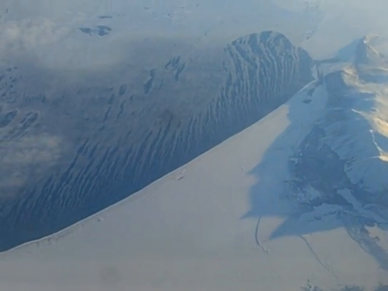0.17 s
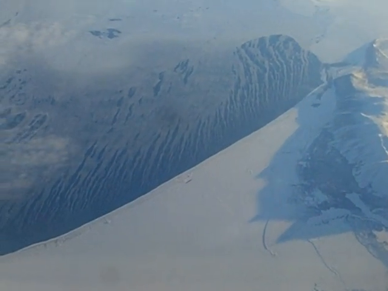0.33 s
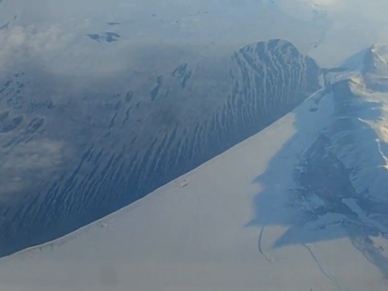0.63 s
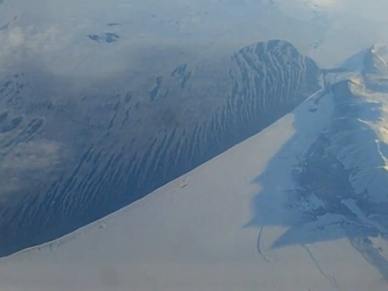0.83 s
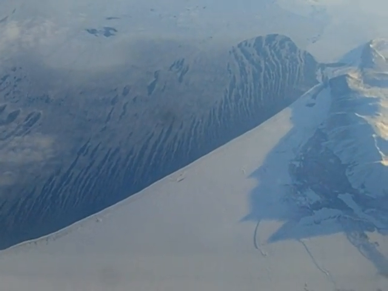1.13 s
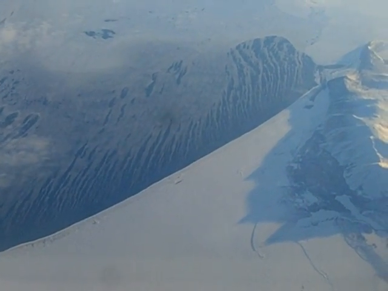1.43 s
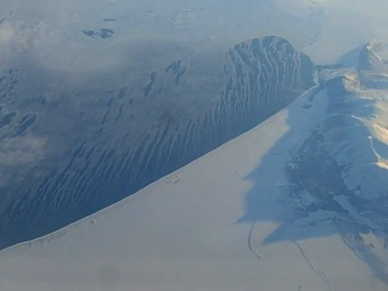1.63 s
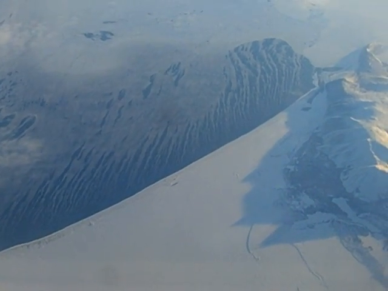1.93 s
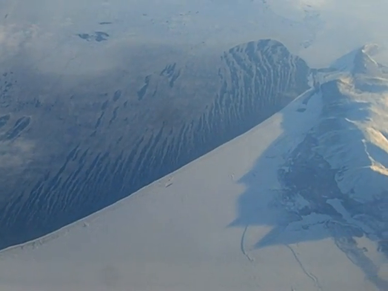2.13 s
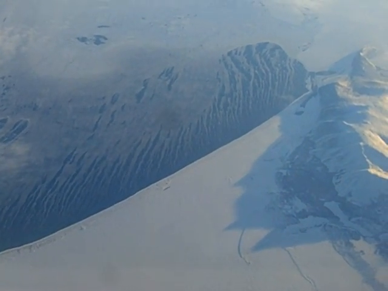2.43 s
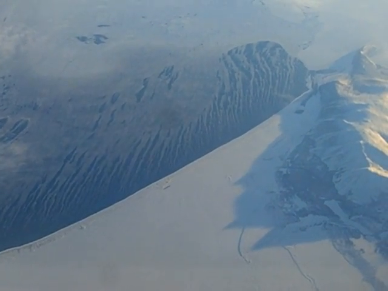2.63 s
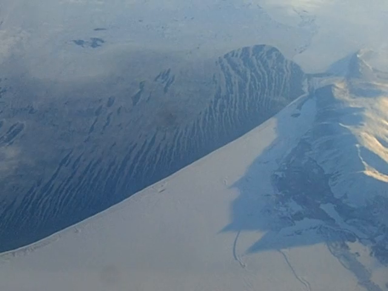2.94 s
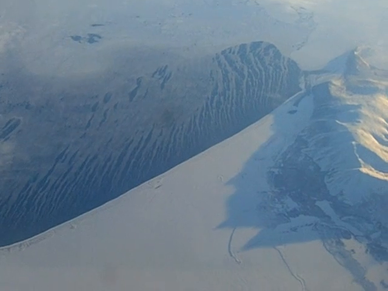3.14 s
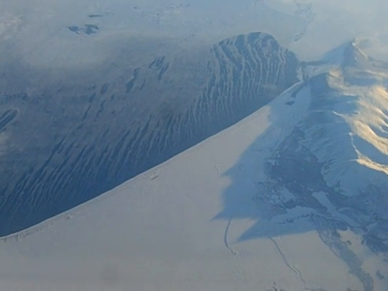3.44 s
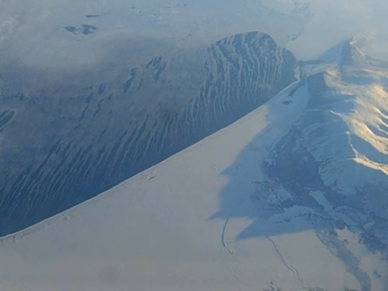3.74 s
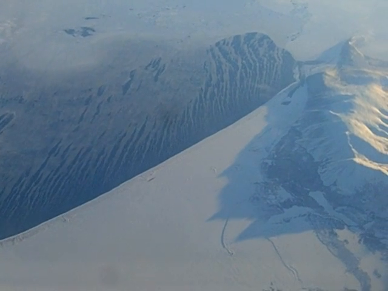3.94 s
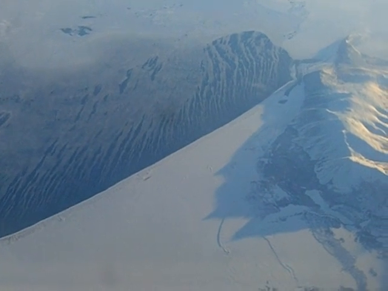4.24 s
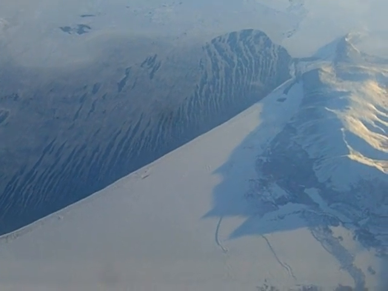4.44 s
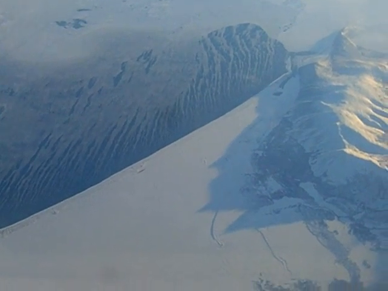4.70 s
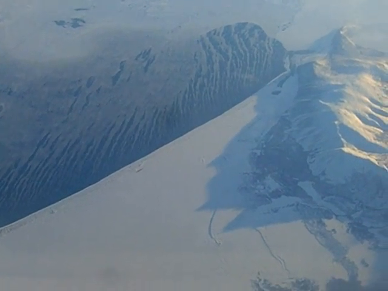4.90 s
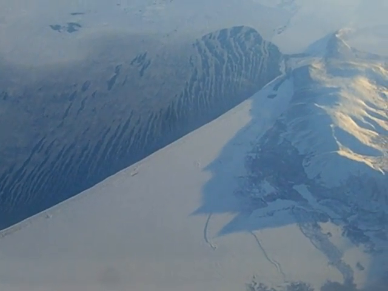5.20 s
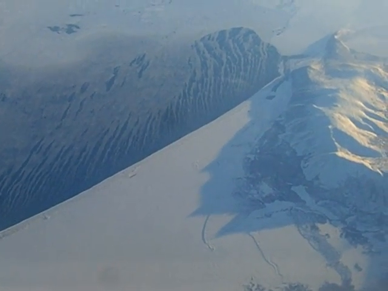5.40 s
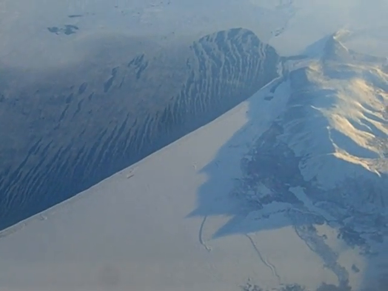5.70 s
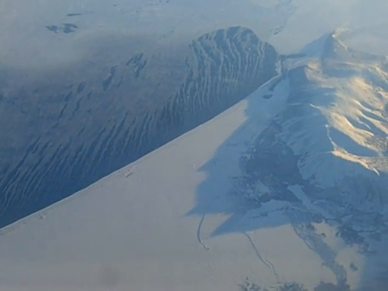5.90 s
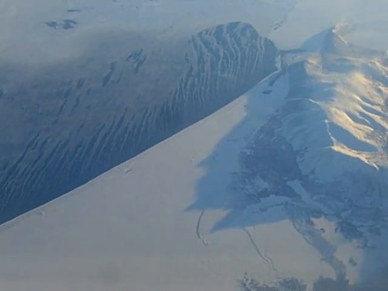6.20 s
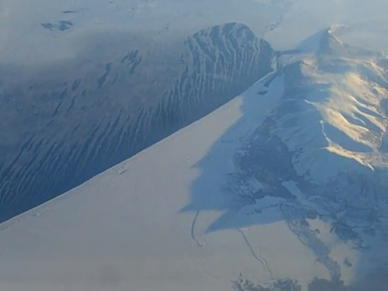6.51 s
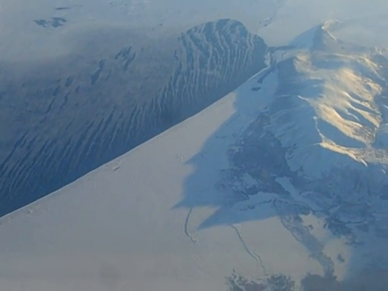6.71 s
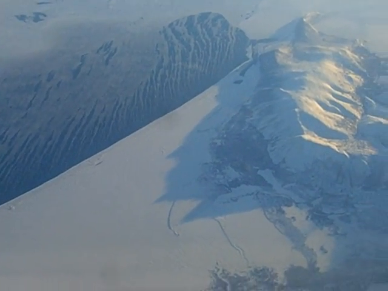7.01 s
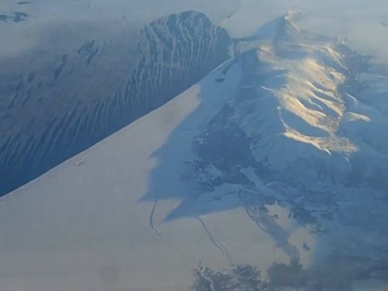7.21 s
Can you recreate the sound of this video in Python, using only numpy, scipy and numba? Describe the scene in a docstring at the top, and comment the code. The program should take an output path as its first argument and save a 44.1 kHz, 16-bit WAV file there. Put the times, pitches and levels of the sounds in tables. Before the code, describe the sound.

A continuous deep roar of rushing air fills a passenger plane in flight, heard from a small microphone by the window. The engine hums and rumbles beneath it, with gentle hiss and a barely audible high whine. Tiny ticks come as the roar peaks. Partway through, a loose panel part starts a thin, quiet, on-and-off buzz, which dies away near the end while the drone carries on.

```python
"""A low, surging boom fills an airliner cabin in cruise: the fuselage under the airflow.
An engine shaft hums, air hisses and a turbine whines faintly; a loose part, shaken by the boom,
buzzes for a while. The level control of a small camera at the window steps its gain down on the
boom's crests, which ticks, and steps back up."""
import sys
import numpy as np
from scipy import signal
from scipy.fft import rfft, irfft, next_fast_len
from scipy.io import wavfile
from scipy.ndimage import uniform_filter1d, minimum_filter1d
from numba import njit

SR = 44100
rng = np.random.default_rng(int(sys.argv[2]) if len(sys.argv) > 2 else 0)


def to_wav(sig):
    """Store sig (one row per channel, or 1-D mono) as 16-bit WAV at the path in sys.argv[1].

    Samples outside -1..1 are clipped; the rate is SR.
    """
    pcm = np.clip(np.atleast_2d(sig), -1, 1) * 32767
    pcm = np.round(pcm).astype(np.int16)
    wavfile.write(sys.argv[1], SR, pcm.T)  # frames by channels


N = 324125


def fuselage_boom(background):
    """Airflow on the fuselage: a low roar that surges to each crest and is held down in between."""
    # boom spectrum: freq_hz, relative_db
    spectrum = [(40, -25.5), (58, -29.5), (72, -10.5), (112, -17), (135, -5), (160, 0), (200, -1),
                (225, -5), (255, 0), (300, -5.5), (325, -4), (380, -12.5), (440, -22), (520, -24),
                (700, -71), (1200, -120)]
    # highest swings of boom plus background, before level control: time_s, peak_db
    crests = [(0.184, -6.7), (0.268, -6.2), (0.449, -6.0), (0.661, -5.6), (0.962, -7.1), (1.092, -4.1),
              (1.402, -5.6), (1.491, -5.2), (1.588, -4.3), (1.835, -4.6), (2.089, -5.4), (2.224, -4.8),
              (2.545, -5.8), (2.901, -5.9), (3.191, -6.7), (3.482, -5.2), (3.826, -5.9), (4.182, -7.1),
              (4.504, -6.6), (4.964, -6.2), (5.234, -6.1), (5.591, -5.8), (5.968, -6.6), (6.248, -6.8),
              (6.672, -8.1), (7.05, -6.3), (7.243, -6.2)]
    crest_s, peak_db = np.transpose(crests)
    roar = from_db(-15.5) * coloured_noise(spectrum)
    last_crest = np.maximum(np.searchsorted(crest_s, np.arange(N) / SR) - 1, 0)
    ceiling = from_db(peak_db[last_crest])
    envelope = np.abs(signal.hilbert(roar + background, next_fast_len(N))[:N])
    gain = minimum_filter1d(np.minimum(1, ceiling / envelope), size=177)
    roar *= uniform_filter1d(gain, size=177)
    surge_hz, half, reach = 222, int(0.006 * SR), 70   # half, reach: samples
    surge = np.hanning(2 * half + 1) * np.cos(2 * np.pi * surge_hz * np.arange(-half, half + 1) / SR)
    for at, peak in zip((crest_s * SR).astype(int), from_db(peak_db)):
        nearby = roar[at - reach:at + reach] + background[at - reach:at + reach]
        top = np.argmax(np.abs(nearby))   # the largest swing becomes the crest
        centre = at - reach + top
        roar[centre - half:centre + half + 1] += (np.sign(nearby[top]) * peak - nearby[top]) * surge
    return roar


def engine_shaft(shaft_hz=47.75, hum_db=-29.5, rumble_db=-40.5):
    """Once-per-turn hum, wavering a little, over a deep rumble."""
    hum = np.sqrt(2) * np.sin(2 * np.pi * shaft_hz * np.arange(N) / SR + 0.25 * drift(rate_hz=2.3))
    rumble = unit_rms(resonance(rng.standard_normal(N), hz=42.6, width_hz=32))
    rumble = signal.sosfilt(signal.butter(4, 58, fs=SR, output="sos"), rumble)
    return from_db(hum_db + 0.59 * drift(rate_hz=3.7)) * hum + from_db(rumble_db) * rumble


def air_and_turbine():
    """Broad airflow hiss; cabin resonances and turbine whines are narrow bands of noise."""
    # airflow and vent spectrum: freq_hz, relative_db
    spectrum = [(260, -17.5), (450, -8.5), (700, -8.5), (930, -14.5), (1260, -18.5), (1860, -26.5),
                (2400, -34), (3000, -38), (4000, -40), (5600, -45), (7000, -48.5), (9000, -49.5),
                (11500, -53), (15800, -60)]
    # cabin resonances: centre_hz, width_hz, rms_db
    cabin_modes = [(571, 70, -39.5), (768, 76, -44), (1040.5, 98, -46.5), (4566, 1100, -64)]
    # turbine whines: centre_hz, width_hz, rms_db
    whines = [(2101, 36, -61.5), (3623, 6, -80), (8000, 150, -80)]
    hiss = from_db(-35) * coloured_noise(spectrum)
    for hz, width_hz, rms_db in cabin_modes + whines:
        band = resonance(rng.standard_normal(N), hz, width_hz)
        hiss += from_db(rms_db) * unit_rms(resonance(band, hz, width_hz))
    flutter_db = 0.54 * drift(rate_hz=12.0)
    return hiss * from_db(flutter_db)


def loose_part(roar):
    """A part on a panel shaken by the boom taps once per swing, harder on wide ones, and rings."""
    # buzz bursts: start_s, length_s, drive_db
    bursts = [(2.839, 0.038, -60), (3.11, 0.063, -54.5), (3.217, 0.2, -60.5), (3.43, 0.069, -62),
              (3.592, 0.051, -57), (3.693, 0.044, -59), (3.737, 0.066, -64), (3.821, 0.052, -59),
              (3.907, 0.057, -66), (4.013, 0.19, -60), (4.216, 0.073, -59), (4.355, 0.044, -71),
              (4.42, 0.19, -58.5), (4.726, 0.055, -58), (4.79, 0.07, -61), (5.001, 0.067, -55),
              (5.083, 0.029, -60), (5.154, 0.13, -56.5), (5.3, 0.12, -60.5), (5.445, 0.089, -53),
              (5.559, 0.05, -62), (5.716, 0.057, -56.5), (5.787, 0.052, -55), (5.882, 0.13, -59),
              (6, 0.03, -56.5), (6.118, 0.046, -56), (6.396, 0.074, -65), (6.71, 0.026, -58)]
    # modes of the part: freq_hz, relative_db, t60_s
    modes = [(5400, -8.5, .004), (5740, -2, 0.0025), (7000, -1.5, 0.002), (7800, -4, 0.0014),
             (9820, -2.5, 0.0079), (10430, -6.5, 0.0039), (12600, -3.5, 0.0011), (14800, -7, .001)]
    edge_s, idle_db, tap_spread_db = 0.01, -78.5, 6
    mode_gain_db, mode_spread_db = 11.5, 2.5
    gap = 0.4   # narrower swings do not reach the part
    panel = unit_rms(resonance(roar, hz=172.7, width_hz=44))
    swing = panel[1:-1]
    at_peak = (swing > panel[:-2]) & (swing >= panel[2:])
    t = np.arange(N - 2) / SR
    drive = from_db(idle_db)   # faint ticking between bursts
    for start_s, length_s, drive_db in bursts:
        fade = np.clip(np.minimum(t - start_s, start_s + length_s - t) / edge_s, 0, 1)
        drive = drive + from_db(drive_db) * fade
    force = np.sqrt(np.clip(swing - gap, 0, 1))
    taps = at_peak * drive * force * from_db(tap_spread_db * rng.standard_normal(N - 2))
    buzz = np.zeros(N)
    for hz, mode_db, t60_s in modes:
        scatter_db = mode_spread_db * rng.standard_normal(N - 2)
        buzz[2:] += ring(taps * from_db(mode_db + mode_gain_db + scatter_db), hz, t60_s)
    return buzz


def ring(taps, hz, t60_s):
    """Each tap starts a decaying sine; a band-pass softens its onset."""
    r, w = from_db(-60 / (t60_s * SR)), 2 * np.pi * hz / SR
    ringing = signal.lfilter([0, np.sin(w)], [1, -2 * r * np.cos(w), r * r], taps + 1e-18)
    return resonance(ringing, hz, width_hz=3000)


def resonance(x, hz, width_hz):
    """Two-pole peak of gain 1."""
    r, w = np.exp(-np.pi * width_hz / SR), 2 * np.pi * hz / SR
    return signal.lfilter([(1 - r * r) / 2, 0, (r * r - 1) / 2], [1, -2 * r * np.cos(w), r * r], x)


def coloured_noise(spectrum):
    """Noise with the given spectrum, rms 1."""
    hz, level_db = np.transpose(spectrum)
    bins_hz = np.arange(1, N // 2 + 2) * SR / N
    shape = from_db(np.interp(np.log(bins_hz), np.log(hz), level_db))
    return unit_rms(irfft(rfft(rng.standard_normal(N)) * shape, N))


def drift(rate_hz):
    """Slow random wander, rms 1."""
    slow = signal.sosfilt(signal.butter(2, rate_hz, fs=SR, output="sos"), rng.standard_normal(N + SR))
    return unit_rms(slow[SR:])


def from_db(db):
    return 10 ** (np.asarray(db) / 20)


def unit_rms(x):
    return x / np.sqrt(np.mean(x ** 2) + 1e-20)


@njit
def level_control(x, limit, step_down, step_up, clock_samples):
    """Gain drops one step on each sample over the limit; a clock steps it back up."""
    out, gain = np.zeros(len(x)), 1.0
    for i in range(len(x)):
        if i % clock_samples == clock_samples - 1:
            gain *= step_up
        if abs(x[i] * gain) > limit:
            gain /= step_down
        out[i] = x[i] * gain
    return out


def scene():
    """Cabin sound, mono."""
    background = engine_shaft() + air_and_turbine()
    roar = fuselage_boom(background)
    return (background + roar + loose_part(roar))[None]


def record(dry):
    """Stepped level control, then a steep low-pass."""
    limit_db, down_db, up_db, clock_s = -6.6, 0.5, 0.25, 0.022
    cutoff_hz = 15760
    levelled = level_control(dry[0], *from_db([limit_db, down_db, up_db]), int(clock_s * SR))
    return signal.sosfilt(signal.ellip(12, 0.5, 60, cutoff_hz, fs=SR, output="sos"), levelled)[None]


dry = scene()
out = record(dry)
to_wav(out)
```